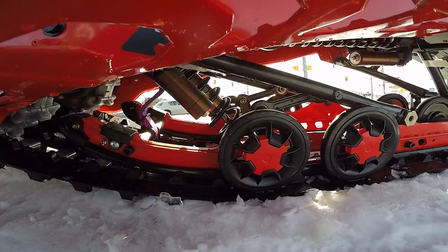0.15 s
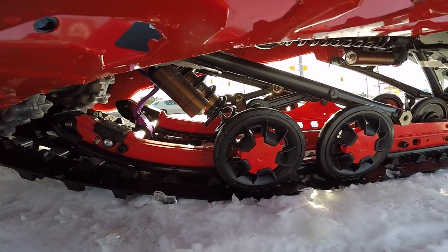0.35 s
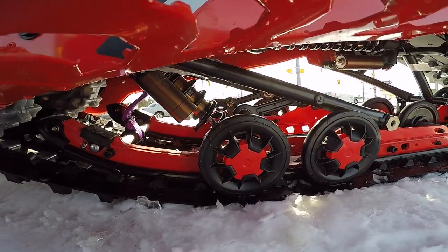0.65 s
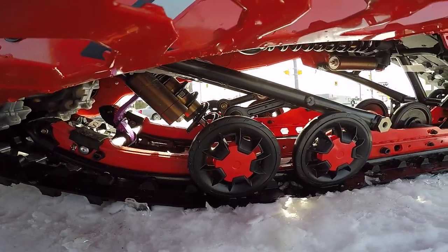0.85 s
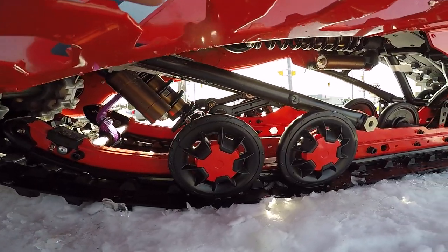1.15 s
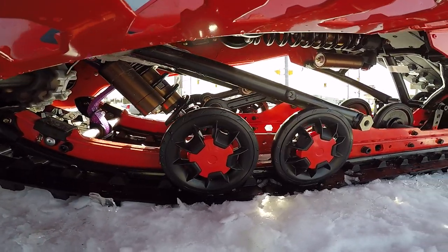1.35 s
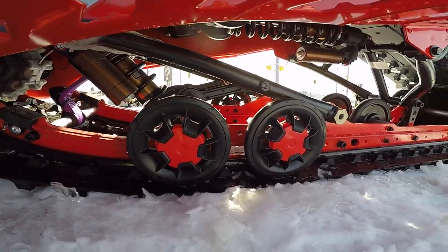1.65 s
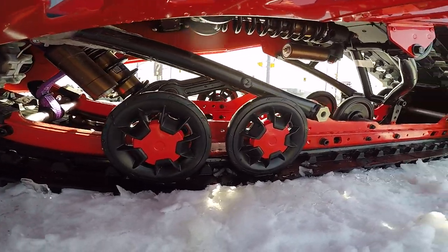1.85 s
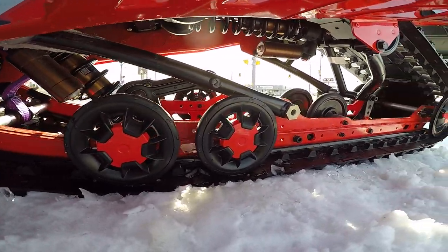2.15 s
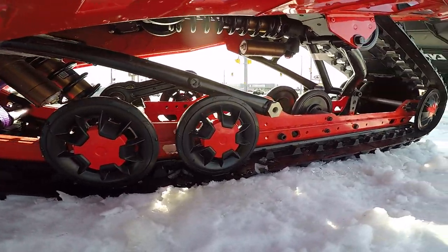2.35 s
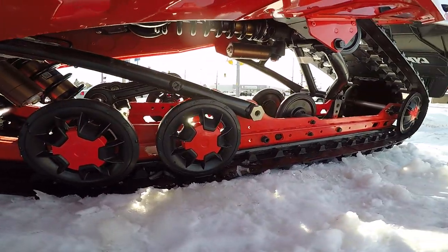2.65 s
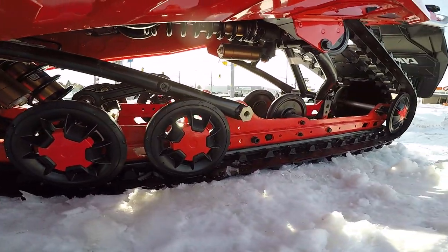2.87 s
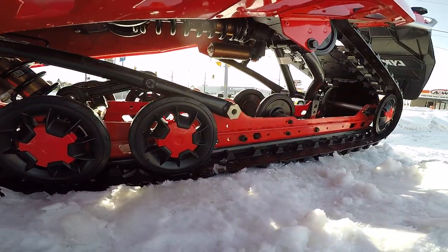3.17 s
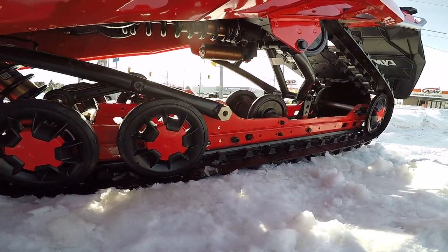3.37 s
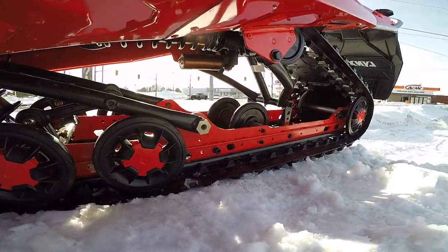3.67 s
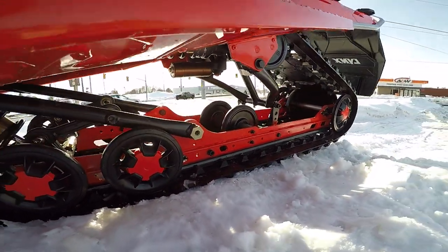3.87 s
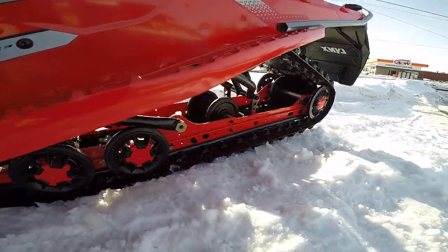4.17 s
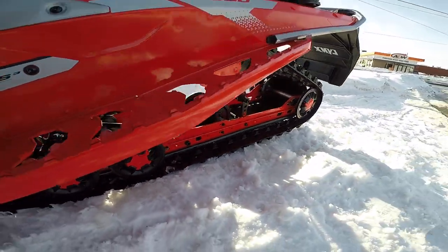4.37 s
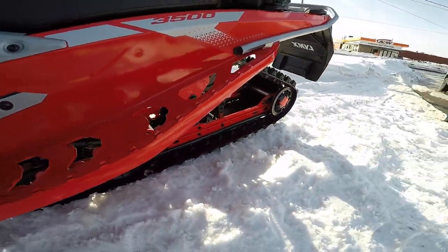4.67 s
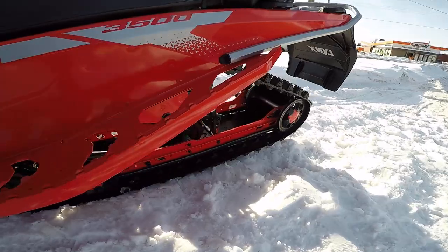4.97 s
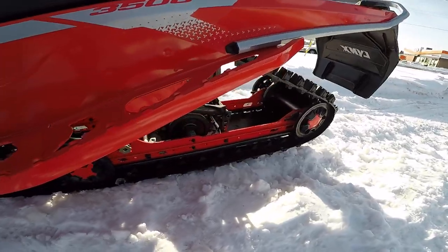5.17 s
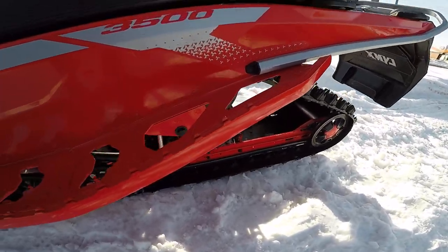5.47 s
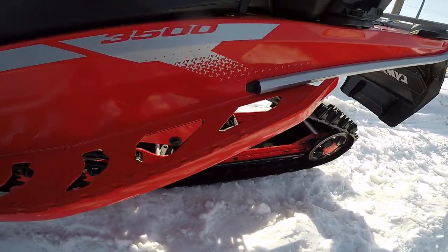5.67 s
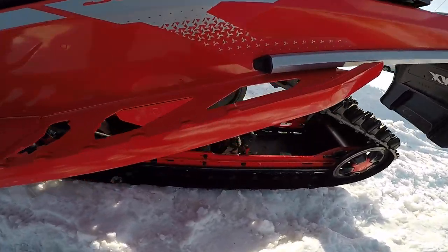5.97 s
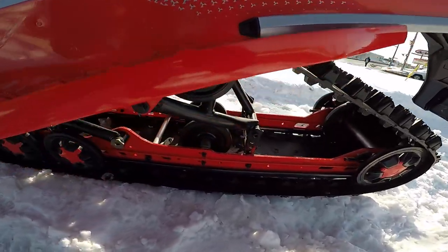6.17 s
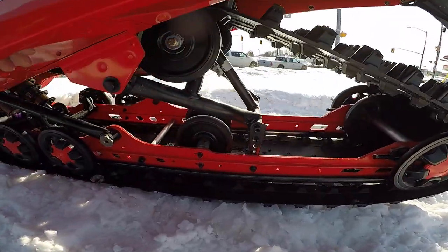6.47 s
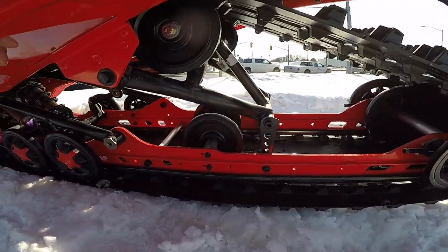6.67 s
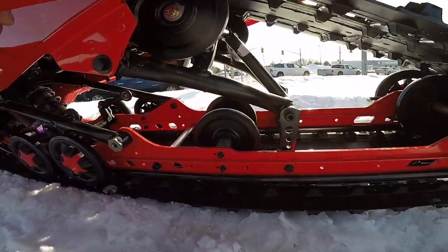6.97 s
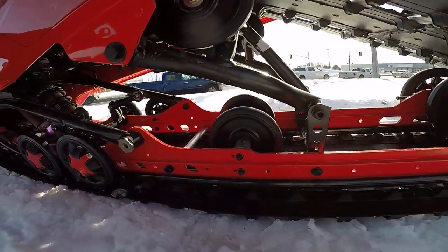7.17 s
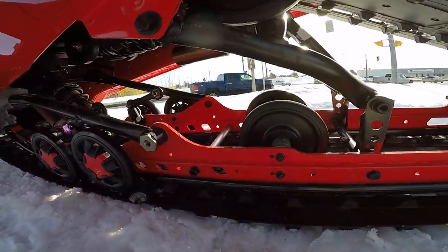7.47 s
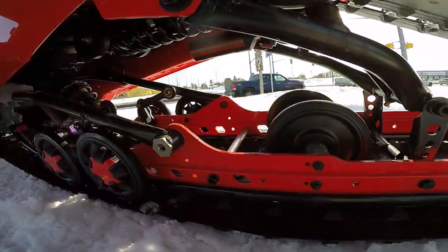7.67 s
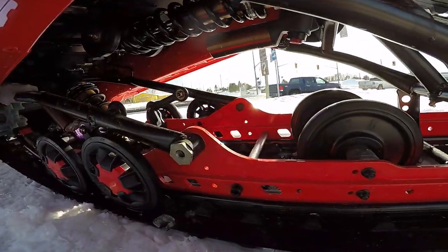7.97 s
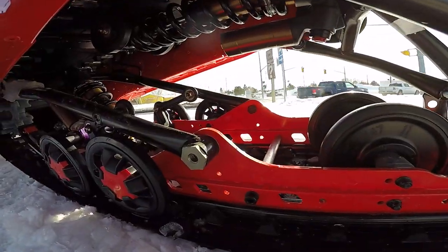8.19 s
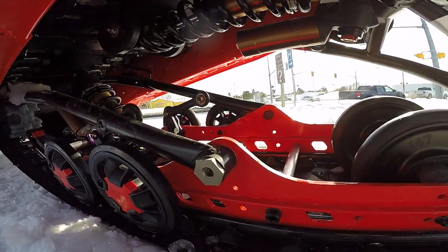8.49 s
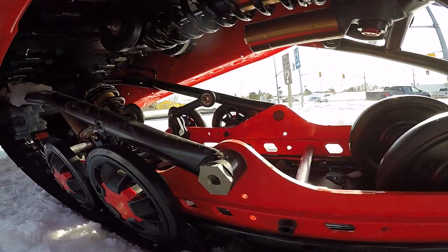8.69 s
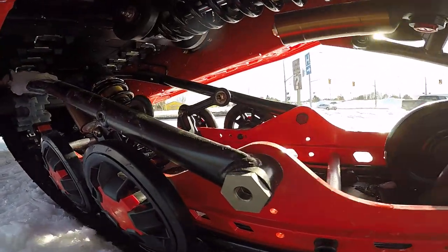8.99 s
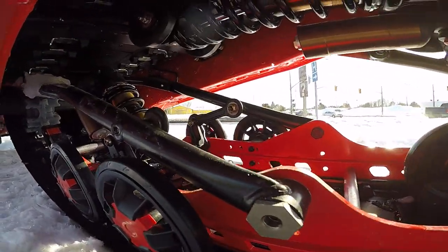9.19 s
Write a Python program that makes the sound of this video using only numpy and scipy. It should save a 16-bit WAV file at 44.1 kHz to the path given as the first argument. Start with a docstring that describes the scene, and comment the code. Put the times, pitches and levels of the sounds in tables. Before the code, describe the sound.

A low engine drone dominates: it starts after a brief quiet opening of bumps and one snappy click, swings up, dips and rises again, then holds steady, creeping slightly higher. Behind it are road roar, airy hiss and faint passing vehicles. Close, dull knocks, rubbing fingers and wind buffeting on the hand-held microphone interrupt, hardest just after six seconds and near nine.

```python
"""Idling engine beside a road

An engine starts, hunts and idles: sines on one crank angle. Road roar and hiss are bands of noise.
Vehicles pass as gliding exhaust tones and resonant tread noise. A hand-held recorder adds wind noise
and slow thumps at its two ports, housing knocks and clicks as ringing modes, and grainy rubbing.
A limiter ducks the sound after the hardest blows."""
import sys
import numpy as np
from scipy import signal
from scipy.io import wavfile
from scipy.ndimage import uniform_filter1d

SR = 44100
rng = np.random.default_rng(int(sys.argv[2]) if len(sys.argv) > 2 else 0)


def unload_wav(signal):
    """Save mono or channel-first audio to the path in sys.argv[1] as 16-bit WAV at rate SR, clipped to [-1, 1]."""
    wavfile.write(
        sys.argv[1],
        SR,
        np.round(np.clip(np.atleast_2d(signal).T, -1, 1) * 32767).astype(np.int16),
    )


N = 411805
TIME_S = np.arange(N) / SR


def from_db(db):
    """Decibel law: the amplitude gain of a level in dB."""
    return 10 ** (np.asarray(db) / 20)


def rms_one(x):
    """Normalization: a signal scaled to rms 1."""
    return x / np.sqrt(np.mean(x ** 2) + 1e-20)


def in_time(rows):
    """Linear interpolation: the columns of a curve, one value a sample."""
    s, *columns = np.transpose(rows)
    return [np.interp(TIME_S, s, column) for column in columns]


def at_hz(points, hz):
    """Logarithmic frequency scale: a spectrum read between its points."""
    point_hz, values = np.array(points).T
    return np.interp(np.log(hz), np.log(point_hz), values)


def sides(pan_db):
    """Interchannel level difference: left and right gains, pan_db being left minus right."""
    return from_db(np.array([pan_db / 2, -pan_db / 2]))


def swell(s, width_s):
    """Gaussian envelope: a bell-shaped gain that peaks at s and falls to 1/e at width_s from it."""
    return np.exp(-((TIME_S - s) / width_s) ** 2)


def drift(rate_hz):
    """Low-pass random fluctuation: noise through a double one-pole filter; rms 1."""
    step = 40   # samples between drawn values
    pole = np.exp(-2 * np.pi * rate_hz * step / SR)
    draws = rng.standard_normal(N // step + 2002)
    slow = signal.lfilter([1], [1, -2 * pole, pole * pole], draws)[2000:]
    return np.interp(np.arange(N) / step, np.arange(len(slow)), rms_one(slow))


def ring(impulses, hz, t60_s):
    """Damped resonator: a unit impulse sets a decaying sine of initial height 1 ringing."""
    radius = from_db(-60 / (t60_s * SR))
    w = 2 * np.pi * hz / SR
    return signal.lfilter([0, np.sin(w)], [1, -2 * radius * np.cos(w), radius * radius], impulses + 1e-18)


def banded_noise(spectrum, patchy_db, likeness, balance, count):
    """Filter-bank synthesis: stereo noise bands with own level, flicker, likeness and balance."""
    edges = np.geomspace(spectrum[0][0], spectrum[-1][0], count + 1)
    shared_flicker = drift(8.8)
    white = rng.standard_normal((2, 2, N))   # neighbouring bands use different noise
    out = 0
    for k, (low, high) in enumerate(zip(edges, edges[1:])):
        band = signal.butter(2, [low, high], "band", fs=SR, output="sos")
        mid, side = signal.sosfilt(band, white[k % 2])
        hz = np.sqrt(low * high)
        alike = np.clip(at_hz(likeness, hz), -1, 1)   # 1 same, 0 unrelated, -1 opposed
        pair = np.sqrt(1 + alike) * mid + np.sqrt(1 - alike) * side * [[1], [-1]]
        gain = from_db(at_hz(spectrum, hz) + patchy_db * (shared_flicker + drift(14.3)))
        out = out + gain * pair * sides(at_hz(balance, hz))[:, None]
    return out / np.sqrt(np.mean(out.mean(axis=0) ** 2))   # the mean of both ports has rms 1


def struck(events, modes, pivot_hz, signs, scatter_db):
    """Modal excitation: each event strikes every mode with a strength of its own."""
    s, level_db, tilt_db, pan_db = np.array(events).T
    at = np.round(s * SR).astype(int)
    luck = rng.standard_normal((len(at), len(modes) + 1))
    polarity = np.sign(luck[:, -1])
    out = np.zeros((2, N))
    for k, (hz, mode_db, t60_s) in enumerate(modes):
        strike_db = mode_db + level_db + tilt_db * np.log2(hz / pivot_hz) + scatter_db * luck[:, k]
        impulses = np.zeros((2, N))
        impulses[:, at] = polarity * from_db(strike_db) * sides(pan_db) * signs
        out += (-1) ** k * ring(impulses, hz, t60_s)   # neighbouring modes start in opposition
    return out


# engine hunting about its idle speed after it catches; the speed is smoothed when played:
# start_s [s], crank_hz [Hz], order_2_db, order_3_db, order_4_db [dB]
ENGINE_CURVE = [(1.5, 32, -10, -31, -31), (1.7, 35.8, -19.5, -19, -32), (1.97, 39.5, -13, -21.5, -33),
                (2.33, 39.6, -15, -20, -26), (2.56, 42, -13.5, -20.5, -23.5),
                (2.93, 32.9, -18.5, -17.5, -37), (3.1, 36, -13, -20.5, -32), (3.3, 39.7, -15, -19, -25),
                (3.62, 41.6, -12.5, -21.5, -24.5), (3.95, 38.14, -14.5, -16.5, -29),
                (4.9, 38.59, -11, -22.5, -26.5), (5.9, 38.93, -12.5, -24, -21.5),
                (6.4, 39.14, -21.5, -15.5, -34.5), (7.35, 39.6, -17.5, -20, -25),
                (7.8, 40.2, -25.5, -24, -27), (8.3, 40.5, -15, -25.5, -30.5),
                (8.75, 41, -21.5, -17.5, -30.5), (9.1, 41.44, -24, -21.5, -38),
                (9.33, 40.9, -39, -32.5, -38)]
# weaker orders: order [per crank turn], level_db [dB re the mean of orders 2 and 3 once settled]
WEAK_ORDERS = [(1, -21), (5, -35), (6, -20.5), (7, -31.5), (8, -31)]
ENGINE_START_S, SETTLED_S = 1.48, 4.04
UNSETTLED_DB = -10   # the weak orders grow from this much lower until the idle settles
FLYWHEEL_S = .12     # flywheel inertia: the crank speed is averaged over this time


def engine():
    """Harmonic synthesis: exhaust orders are sines at multiples of the crank angle, wavering a little."""
    crank_hz, second_db, third_db, fourth_db = in_time(ENGINE_CURVE)
    crank_hz = uniform_filter1d(crank_hz, size=int(FLYWHEEL_S * SR))
    angle = 2 * np.pi * np.cumsum(crank_hz * (1 + .002 * drift(2.84))) / SR
    growth_db = np.interp(TIME_S, [ENGINE_START_S, SETTLED_S], [UNSETTLED_DB, 0])
    weak_db = (second_db + third_db) / 2 + growth_db
    levels = [(2, second_db), (3, third_db), (4, fourth_db)]
    levels += [(order, weak_db + db) for order, db in WEAK_ORDERS]
    tone = 0
    for order, level_db in levels:
        tone = tone + np.sqrt(2) * from_db(level_db + 0.5 * drift(11.0)) * np.sin(order * angle)
    return tone * np.clip((TIME_S - ENGINE_START_S) / .15, 0, 1)


# knocks through the housing, before scatter between modes:
# start_s [s], level_db [dB at 400 Hz], tilt_db [dB per octave], pan_db [dB, left minus right]
KNOCKS = [(0.033, -13.5, -2, -6.5), (0.116, -15, -2, 6), (0.185, -13, 1, 14), (0.831, -5, 5, -1.5),
          (1.223, -10.5, 1.5, -6), (1.277, -15, -5, -7), (2.195, -14, 0, -3), (2.372, -17, 0, -6),
          (2.716, -18, -12.5, -13), (3.028, -19.5, -6, -11), (3.616, -18, 7, -2.5), (3.712, -18, -3, -5),
          (4.654, -19.5, -4, -7), (5.081, -19, -1, -9), (5.733, -20, -3, -9), (5.89, -26, 1, -4),
          (5.961, -15, 7, -2), (6.112, 1.5, -1.5, -6), (6.248, 3.5, -3.5, -4.5), (7.065, -17, -8, -7),
          (7.354, -16, -2, -1), (7.6, -14, -6, -6.5), (7.714, -12, -8, -8.5), (8.072, -20, 3, -7),
          (8.357, -10, 5, -1.5), (8.778, -6, 1, -1.5), (8.913, -8.5, 3, 3), (9.036, 1, -1, 1),
          (9.142, -7.5, 2, 3.5), (9.257, -10.5, -6, 14)]
# housing resonances: mode_hz [Hz], level_db [dB], t60_s [s]
HOUSING_MODES = [(150, -3.5, 0.049), (258, -2, .035), (408, -0.5, 0.024), (616, -4.5, .015),
                 (880, -5.5, 0.0077), (1300, -16.5, 0.0056)]


def knocks():
    """Flexural modes: the housing bends oppositely at the two ports; a soft contact dulls the blow."""
    events = np.vstack([KNOCKS, small_knocks(count=110)])
    blows = struck(events, HOUSING_MODES, pivot_hz=400, signs=[[1], [-1]], scatter_db=2.3)
    return signal.sosfilt(signal.butter(3, 1700, fs=SR, output="sos"), blows)


# faint taps: level re the wind and its full spread [dB], tilt [dB per octave], pan [dB, left minus right]
TAP_DB, TAP_SPREAD_DB, TAP_TILT_DB, TAP_PAN_DB = -3, 5.5, -5.5, -5


def small_knocks(count):
    """Random point process: faint dull taps, stronger while the recorder is buffeted."""
    when, size, pan = rng.random((count, 3)).T
    at = (when * (N - 1)).astype(int)
    wind_db = 20 * np.log10(gusting()[0][at])
    level_db = wind_db + TAP_DB + TAP_SPREAD_DB * (size - .5)
    pan_db = TAP_PAN_DB + 8 * (pan - .5)
    return np.transpose([at / SR, level_db, np.full(count, TAP_TILT_DB), pan_db])


# sharp clicks close by, before scatter between modes:
# start_s [s], level_db [dB at 4000 Hz], tilt_db [dB per octave], pan_db [dB, left minus right]
CLICKS = [(.184, -15.5, -3, 4.5), (6.2285, -24.5, 10, -17.5)]
# resonances of the hard plastic: mode_hz [Hz], level_db [dB], t60_s [s]
CLICK_MODES = [(426, -4.5, 0.019), (910, -4, 0.0049), (1670, -6, 0.0056), (3620, 0, 0.0058),
               (5040, -3, 0.0047), (6450, 3, 0.0037), (7330, -1, 0.0036), (9550, -11, .003)]


def clicks():
    """Impulse response: hard plastic snaps excite short high modes, in phase at both ports."""
    return struck(CLICKS, CLICK_MODES, pivot_hz=4000, signs=[[1], [1]], scatter_db=1.5)


# slow pushes of air on both ports, before shaping:
# start_s [s], level_db [dB], rate_hz [Hz, 1 / duration], slowness [no unit, slower rise and faster decay]
THUMPS = [(.187, 2, 72, .85), (.31, -2, 25, 1.6)]


def thumps():
    """Pressure pulse: one over-and-under swing, the second half weaker."""
    out = np.zeros(N)
    for s, level_db, rate_hz, slowness in THUMPS:
        turn = np.clip((TIME_S - s) * rate_hz, 0, 1)
        rise = np.minimum(turn / .3, 1) ** (3 * max(slowness - 1, 0))
        decay = np.exp(-.7 * slowness * turn)
        out += from_db(level_db) * rise * np.sin(2 * np.pi * turn ** .85) * decay
    return out


# turbulence at the ports: band_hz [Hz], density_db [dB per Hz, relative]
BUFFET_SPECTRUM = [(15, -14), (22, -1), (53, 1.5), (125, -2), (190, -9), (280, -17), (450, -48.5)]


def wind():
    """Turbulent pressure: lumpy low noise, nearly unrelated or a little opposed at the two ports."""
    gain, pan_db = gusting()
    likeness = [(30, -0.00053), (90, -.1), (250, -0.1)]   # (Hz, likeness)
    balance = [(30, 0.64), (200, -1.0)]                   # (Hz, left minus right dB)
    return gain * sides(pan_db) * banded_noise(BUFFET_SPECTRUM, 1.7, likeness, balance, count=10)


# gusts on the ports, added to the calm:
# start_s [s], length_s [s, rise included], level_db [dB], pan_db [dB, left minus right]
GUSTS = [(-.1, 0.26, -17.5, 2), (0.942, 0.49, -30, -4.5), (1.49, 0.67, -30, -2.5),
         (2.323, 0.087, -21.5, -7.5), (2.647, 0.605, -22.5, -1.5), (3.672, .1, -25, -7),
         (3.85, .25, -31.5, -2.5), (5.755, .5, -30.5, -6), (7.361, 0.725, -21, -1),
         (8.302, 0.53, -22.5, -0.5), (8.843, .6, -18.5, 2.5)]
CALM_DB, CALM_PAN_DB = -33.5, -4.5
GUST_RISE_S, GUST_FALL_S = 0.037, 0.047   # linear rise; exponential time constant of the fall


def gusting():
    """Amplitude envelope: gain and pan of the wind as gusts rise out of the calm, hold and fall."""
    gain, pan_db = from_db(CALM_DB), CALM_PAN_DB
    for s, length_s, level_db, gust_pan_db in GUSTS:
        rise = np.clip((TIME_S - s) / GUST_RISE_S, 0, 1)
        shape = rise * np.exp(-np.maximum(TIME_S - s - length_s, 0) / GUST_FALL_S)
        gain = gain + from_db(level_db) * shape
        pan_db = pan_db + (gust_pan_db - CALM_PAN_DB) * shape
    return gain, pan_db


# finger strokes on the housing, before the grain: peak_s [s], level_db [dB], width_s [s]
RUBS = [(0.118, -32, 0.037), (0.246, -39.5, 0.026), (3.78, -32, .03), (3.945, -28, 0.056),
        (4.13, -28, 0.029), (5.868, -25.5, 0.039), (5.969, -31, 0.025), (6.26, -15.5, 0.016),
        (9.252, -24, .05)]
# colour of the scuffs: band_hz [Hz], density_db [dB per Hz, relative]
RUBBING_SPECTRUM = [(150, -19.5), (280, 9.5), (600, -9), (1000, -6.5), (1800, -16), (3000, -30.5)]


def rubbing():
    """Stick-slip friction: grainy scuffs, mostly opposite in the ports; the grip rustles with the wind."""
    stroke = from_db(-24) * gusting()[0]
    for s, level_db, width_s in RUBS:
        stroke = stroke + from_db(level_db) * swell(s, width_s)
    grain = from_db(3.6 * drift(48))   # skin sticks and slips
    likeness = [(300, -0.77), (1500, -0.85)]   # (Hz, likeness)
    balance = [(300, -2.0), (1500, 2)]         # (Hz, left minus right dB)
    scuff = banded_noise(RUBBING_SPECTRUM, 3.44, likeness, balance, count=8)
    return stroke * grain * rms_one(scuff)


# exhaust tones on the road: peak_s [s], width_s [s], level_db [dB], before_hz, after_hz [Hz]
TRAFFIC = [(1.35, 0.48, -24.5, 81, 88), (1.09, 0.47, -28, 102, 107), (7.3, 0.415, -22.5, 120, 110),
           (8.6, 0.404, -28.5, 219, 246)]


def traffic():
    """Frequency modulation: exhaust tones swell, glide in pitch through their loudest moment and fade."""
    out = np.zeros(N)
    for s, width_s, level_db, before_hz, after_hz in TRAFFIC:
        glide = (1 + np.tanh(1.454 * (TIME_S - s) / width_s)) / 2
        phase = 2 * np.pi * np.cumsum(before_hz + (after_hz - before_hz) * glide) / SR
        out += np.sqrt(2) * from_db(level_db) * swell(s, width_s) * np.sin(phase)
    return out


# tyre whirr of passing vehicles, before the resonance levels: peak_s [s], width_s [s], level_db [dB]
PASSING = [(1.5, 0.98, -49), (7.3, 0.48, -38.5), (8.5, 0.47, -43)]
# resonances of the whirr: centre_hz [Hz], width_hz [Hz], level_db [dB]
WHIRR = [(1306, 370, -0.5), (3520, 770, -8)]


def passing():
    """Resonant filtering: tread noise in two broad bands swells with each passing vehicle."""
    noise = rng.standard_normal((3, N))
    pair = noise[:2] + noise[2]   # partly alike at the two ports
    out = 0
    for hz, width_hz, level_db in WHIRR:
        band = signal.butter(2, [hz - width_hz / 2, hz + width_hz / 2], "band", fs=SR, output="sos")
        out = out + from_db(level_db) * rms_one(signal.sosfilt(band, pair))
    return out * sum(from_db(level_db) * swell(s, width_s) for s, width_s, level_db in PASSING)


# airborne background: start_s [s], roar_db [dB], hiss_db [dB]
AIR_LEVELS = [(0, -43.5, -47), (.17, -44.5, -48.5), (.45, -54, -59.5), (1.2, -43.5, -46), (2, -44.5, -48.5),
              (4.3, -45.5, -46), (5.4, -41.5, -43.5), (6.35, -43, -38.5), (7.2, -40.5, -35.5),
              (8.9, -38.5, -37.5), (9.33, -41.5, -39)]
# brief swells of the hiss: start_s [s], rise_db [dB before scaling for each band], fall_s [s]
HISS_SWELLS = [(1.145, 1, 0.094), (4.217, 1.5, 0.098), (4.803, 2.5, 0.057), (5.311, 3.5, 0.046),
               (5.851, 1, 0.086), (8.896, 2, 0.075)]
# spectra of exhaust rumble, road roar, hiss and its top: band_hz [Hz], density_db [dB per Hz, relative]
RUMBLE_SPECTRUM = [(25, -14.5), (50, -6), (90, 1.5), (150, -8.5), (240, -15), (400, -22), (700, -42)]
ROAR_SPECTRUM = [(250, -3), (500, -5.5), (800, 2.5), (1250, 1.5), (1800, -5.5), (2600, -13), (5000, -37.5)]
HISS_SPECTRUM = [(1400, -7.5), (1900, -1), (2500, 0), (3300, -1), (4100, -2), (4750, -5), (5400, -2.5),
                 (6200, 4.5), (7000, -10), (7800, -24)]
HISS_TOP_SPECTRUM = [(6500, -9), (7600, -1.5), (8500, -8), (9500, -8.5), (11000, -17.5), (13000, -23.5),
                     (14600, -37.5)]
# correlation between the ports: band_hz [Hz], likeness [-1 to 1]
LIKENESS = [(60, 0.95), (200, 1), (450, 0.81), (800, 0.15), (1700, 0.16), (2800, 0.49), (4200, 0.7),
            (6000, 0.62), (6800, .4), (7900, -0.44), (9200, -0.1), (14000, .1)]
# balance of the ports: band_hz [Hz], pan_db [dB, left minus right]
PORT_BALANCE = [(200, -2), (450, 1.5), (800, 1.5), (1700, 3), (3300, -2), (5300, 2), (6300, 0.5),
                (7100, -17), (7900, -14.5), (8800, -10.5), (9800, -5.5), (14000, -2)]
RUMBLE_DB, RUMBLE_FOLLOWS = -30, .35   # at mean road roar; share of the roar's swing in dB
RUMBLE_GROWS_DB = 4                    # over the second after the idle settles
TOP_DB, TOP_FOLLOWS = -56, 0.49        # at mean hiss level; share of the hiss's swing in dB


def background():
    """Superposition: exhaust rumble, road roar and hiss arrive through the air as partly alike noise."""
    roar_db, hiss_db = in_time(AIR_LEVELS)
    rumble_db = RUMBLE_DB + RUMBLE_FOLLOWS * (roar_db - roar_db.mean())
    rumble_db = rumble_db + RUMBLE_GROWS_DB * np.clip(TIME_S - SETTLED_S, 0, 1)
    top_db = TOP_DB + TOP_FOLLOWS * (hiss_db - hiss_db.mean())
    swell_db = 0
    for s, rise_db, fall_s in HISS_SWELLS:   # quick rise, slower fall
        since = TIME_S - s
        fall = np.exp(-(np.maximum(since, 0) / fall_s) ** 2)
        swell_db = swell_db + rise_db * np.clip(since / .006, 0, 1) * fall
    rumble = banded_noise(RUMBLE_SPECTRUM, 0.87, LIKENESS, PORT_BALANCE, count=10)
    roar = banded_noise(ROAR_SPECTRUM, 0.51, LIKENESS, PORT_BALANCE, count=11)
    hiss = banded_noise(HISS_SPECTRUM, 0.6, LIKENESS, PORT_BALANCE, count=14)
    top = banded_noise(HISS_TOP_SPECTRUM, 1.0, LIKENESS, PORT_BALANCE, count=9)
    low = from_db(rumble_db) * rumble + from_db(roar_db) * roar
    return low + from_db(hiss_db + 1.3 * swell_db) * hiss + from_db(top_db + 2.8 * swell_db) * top


def scene():
    """Linear superposition: all sources add at the two ports."""
    handling = knocks() + clicks() + thumps() + wind() + rubbing()
    return engine() + handling + traffic() + passing() + background()


CEILING_DB, RELEASE_DB_PER_S, AHEAD = -.8, 120, 40   # AHEAD in samples
CUTOFF_HZ = 14600


def record(dry):
    """Peak limiting: gain drops for peaks over a ceiling and recovers steadily; the top is cut."""
    peak_db = 20 * np.log10(np.abs(dry).max(axis=0) + 1e-9)
    over_db = np.maximum(peak_db - CEILING_DB, 0)
    ramp_db = RELEASE_DB_PER_S * TIME_S
    held_db = np.maximum.accumulate(over_db + ramp_db) - ramp_db
    shifted_db = np.append(held_db[AHEAD:], np.zeros(AHEAD))
    early_db = uniform_filter1d(shifted_db, size=2 * AHEAD)   # gain falls just before the peak
    limited = np.clip(dry * from_db(-early_db), -.93, .93)
    return signal.sosfilt(signal.cheby2(12, 40, CUTOFF_HZ, fs=SR, output="sos"), limited)


dry = scene()
out = record(dry)
unload_wav(out)
```